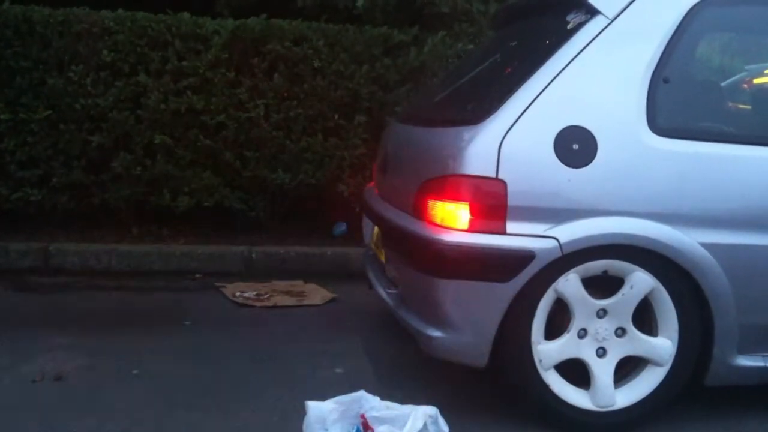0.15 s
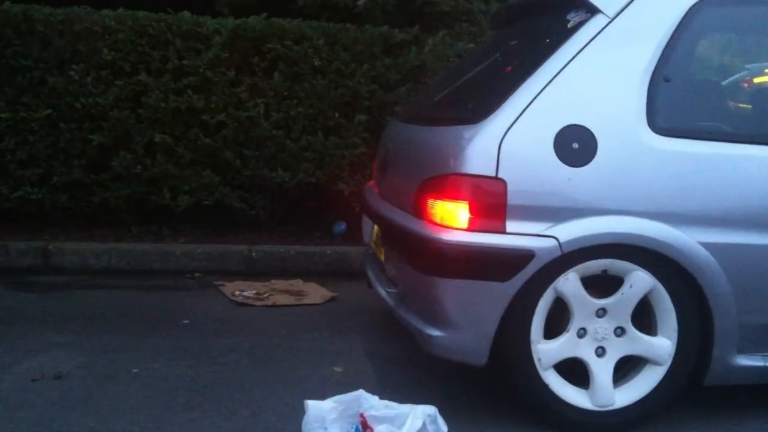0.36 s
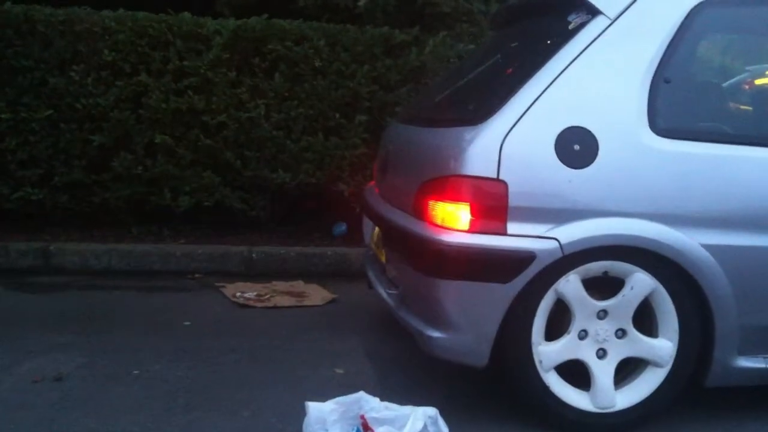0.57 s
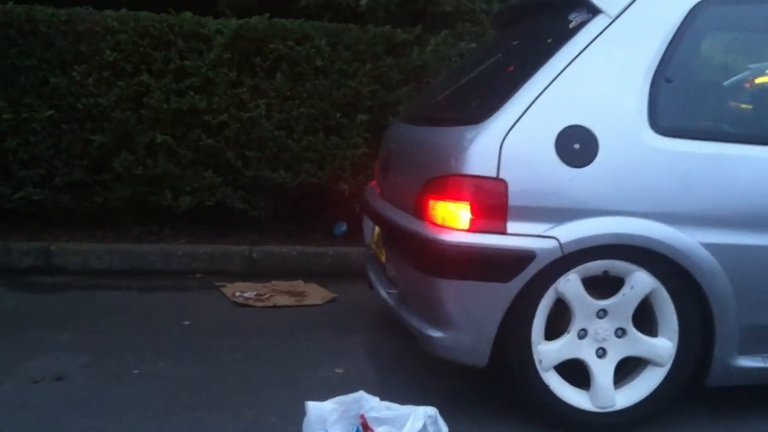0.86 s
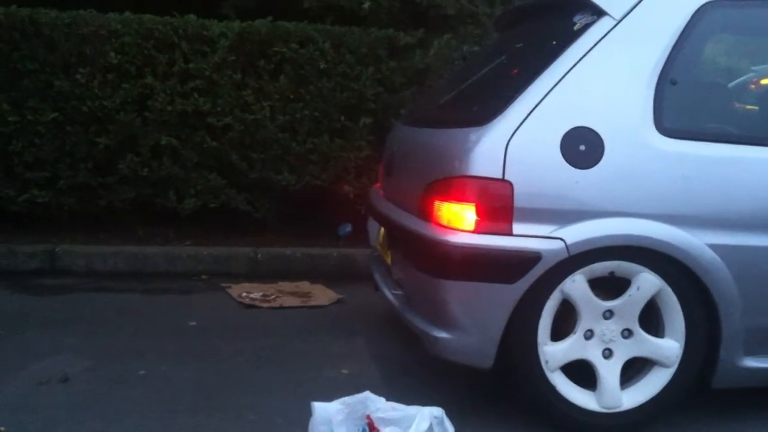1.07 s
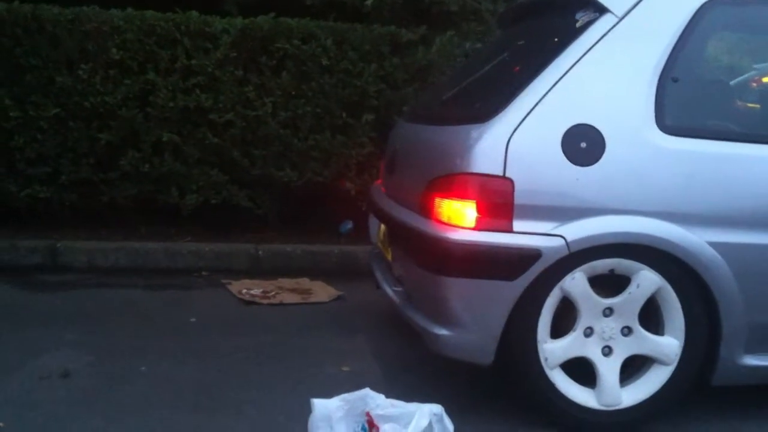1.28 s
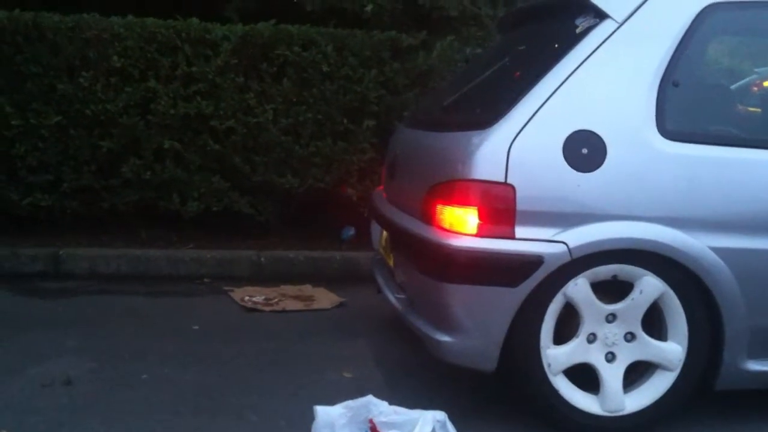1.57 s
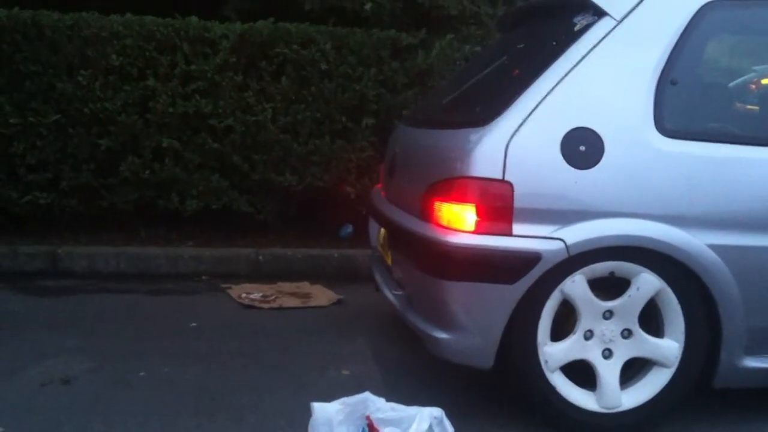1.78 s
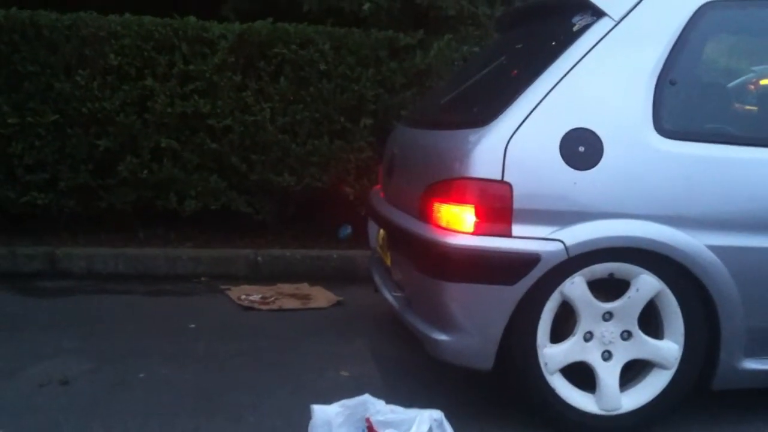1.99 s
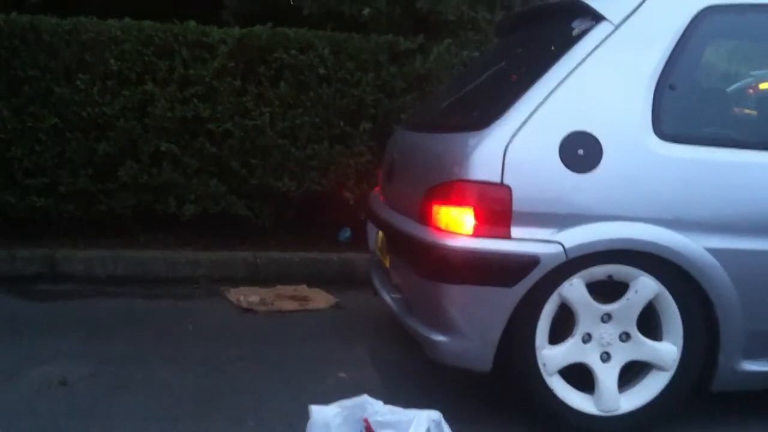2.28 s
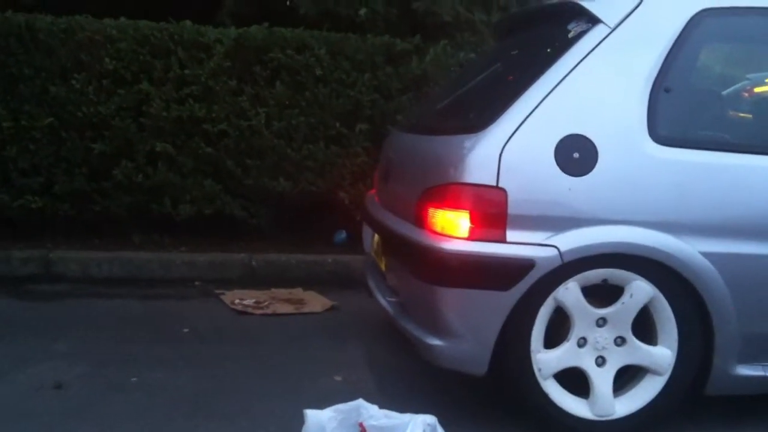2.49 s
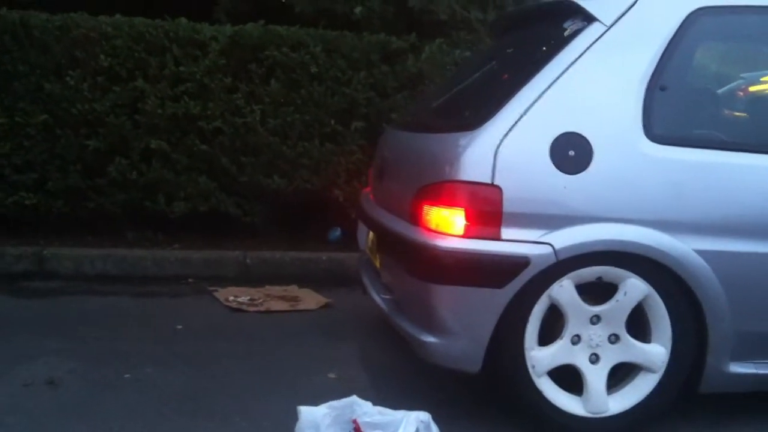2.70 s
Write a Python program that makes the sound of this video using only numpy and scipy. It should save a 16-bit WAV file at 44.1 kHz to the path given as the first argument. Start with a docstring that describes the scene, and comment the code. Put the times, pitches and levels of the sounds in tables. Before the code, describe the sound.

Loud backfire bang from a small car, followed by two quick revs and exhaust pops.

```python
"""A street between houses, the microphone a few metres beside the tailpipe of a small hatchback.
The four-cylinder engine's revs fall; unburnt fuel explodes in the exhaust and the house fronts
slap the bang back. Two throttle blips boom and rasp in the pipe, each sinking into a drone, and
sharp pops follow. Behind it all the engine bay rushes and whines."""
import sys
import numpy as np
from scipy import signal
from scipy.fft import rfft, irfft
from scipy.io import wavfile
from scipy.ndimage import map_coordinates

SR = 44100
rng = np.random.default_rng(int(sys.argv[2]) if len(sys.argv) > 2 else 0)


def dump_mix(stems):
    """Bounce the given channels to the path in sys.argv[1] as a 16-bit WAV at rate SR."""
    frames = np.atleast_2d(stems).T  # one column per channel
    limited = np.clip(frames, -1, 1)  # hard clip at full scale
    pcm = np.round(limited * 32767).astype(np.int16)
    wavfile.write(sys.argv[1], SR, pcm)


N = 125685
T = np.arange(N) / SR


def undb(db):
    return 10 ** (np.asarray(db) / 20)


def unit(x):
    """Scale to rms 1."""
    return x / np.sqrt(np.mean(x ** 2))


def curve(rows, column=1):
    """One column of a table joined by straight lines in time."""
    rows = np.array(rows)
    return np.interp(T, rows[:, 0], rows[:, column])


def colour(x, points):
    """Filter by a spectrum of (Hz, dB) points, falling away below the first."""
    hz, db = np.array(points).T
    f = np.maximum(np.arange(N + 1) * SR / (2 * N), 1)
    gain = undb(np.interp(np.log(f), np.log(hz), db)) * np.minimum(f / hz[0], 1) ** 2
    return irfft(rfft(x, 2 * N) * gain)[:N]


def noise(points):
    """Coloured noise of rms 1."""
    return unit(colour(rng.standard_normal(N), points))


def resonate(x, hz, width):
    """One resonance, gain 1 at its centre."""
    return signal.lfilter(*signal.iirpeak(hz, hz / width, fs=SR), x)


def walk(rate):
    """Smooth random drift, `rate` steps a second, with a spread near 1."""
    return map_coordinates(rng.standard_normal(4096), [T * rate], order=2, mode="wrap")


def burst(start, decay, attack=.0006):
    """A quick rise and an exponential fall; times in seconds."""
    age = np.maximum(T - start, 0)
    return np.minimum(age / attack, 1) * np.exp(-age / decay)


# Clatter and belt hiss from the far end of the car (frequency [Hz], level [dB])
CLATTER_SPECTRUM = [(100, 6.5), (250, 6), (340, -6), (450, -0.5), (700, 1.5), (1050, 2), (1400, -2),
                    (1700, 2.5), (2150, 1.5), (2500, -12), (4000, -76)]
BELT_SPECTRUM = [(1500, -16), (2600, 1.5), (3400, 5.5), (5000, 1), (11000, -7.5), (16000, -10.5)]
# Slow sway of both (time [s], level [dB])
BAY_SWAY = [(0, 1), (.6, -0.5), (1.9, 3), (2.5, 3), (2.7, -4)]

def engine_bay(firing_hz, turns):
    """Clatter and belt hiss grow with the revs and pulse faintly with each firing."""
    octaves = np.log2(firing_hz / 100)
    flicker = (1 + .022 * np.cos(2 * np.pi * turns)) * undb(.9 * walk(70))
    clatter = undb(-33.5 + 8 * octaves) * noise(CLATTER_SPECTRUM)
    belt = undb(-40 + 10.5 * octaves) * noise(BELT_SPECTRUM)
    return (clatter + belt) * flicker * undb(curve(BAY_SWAY))


# Moments when the whine comes forward (time [s], half length [s], level [dB])
WHINE_SWELLS = [(0.154, 0.11, -36), (1.012, 0.02, -48), (1.791, 0.05, -33.5), (2.263, 0.015, -30),
                (2.394, 0.0096, -31), (2.433, 0.02, -30.5)]

def whine(hz=2024, width_hz=82, rest_db=-48.5):
    """A thin, wavering whine in the engine bay swells now and then."""
    swells = sum(undb(db) * np.exp(-((T - at) / half) ** 2) for at, half, db in WHINE_SWELLS)
    ring = resonate(resonate(rng.standard_normal(N), hz, width_hz), hz, width_hz)
    wavering = map_coordinates(ring, [(T + .001 * walk(12)) * SR], order=1, mode="mirror")
    return (undb(rest_db) + swells) * unit(wavering)


# The four cylinders in firing order (level [dB])
CYLINDER_DB = [1.4, -.8, .4, -1.7]

def firings(turns, scatter_db, jitter_s):
    """One pulse per firing; the cylinders differ and every firing varies."""
    count = np.arange(1, int(turns[-1]))
    timing, strength = rng.standard_normal((512, 2))[:len(count)].T
    at = np.interp(count, turns, T) + jitter_s * timing
    level_db = np.array(CYLINDER_DB)[count % len(CYLINDER_DB)] + scatter_db * strength
    pulses = np.zeros(N)
    pulses[np.clip((at * SR).astype(int), 0, N - 1)] = undb(level_db)
    return pulses


def exhaust_tone(turns, orders, rough, flutter_rate):
    """Multiples of the firing rate, each wavering in level and phase; rms 1."""
    out = 0
    for order, db in orders:
        flutter = 1 + rough * (walk(flutter_rate) + 1j * walk(flutter_rate))
        out += undb(db) * (flutter * np.exp(2j * np.pi * order * turns)).imag
    return unit(out)


# The burble between blips (time [s], level [dB])
IDLE_LEVEL = [(.3, -39.5), (.55, -42), (.71, -47), (.78, -39), (.93, -43.5), (1.02, -45), (1.7, -34),
              (1.95, -34), (2.65, -46), (2.85, -38)]
# Its partials (multiple of the firing rate, level [dB])
IDLE_ORDERS = [(1, 6), (2, -1.5), (3, 7.5), (4, 0.5), (5, -20)]
# What the silencer lets into the street (frequency [Hz], gain [dB])
SILENCER_RESPONSE = [(60, 6), (95, 0), (125, 4), (165, -1.5), (215, -5.5), (350, -8), (600, 2)]

def idle(turns):
    """At low revs the exhaust burbles unevenly through the silencer."""
    burble = exhaust_tone(turns, IDLE_ORDERS, rough=.3, flutter_rate=18)
    return undb(curve(IDLE_LEVEL)) * unit(colour(burble, SILENCER_RESPONSE))


# Stretches with the throttle shut (start [s], end [s], level [dB])
OVERRUNS = [(-.05, 0.21, -28), (1.392, 1.68, -29.5), (2.321, 2.592, -26.5)]
# The drone's overtones and the gas hiss at the tailpipe (frequency [Hz], level [dB])
OVERRUN_SPECTRUM = [(110, -22), (185, 2), (230, 2), (280, 3.5), (335, -26), (410, -1.5), (520, -14),
                    (1300, -41)]
HISS_SPECTRUM = [(1000, -4), (2500, -1.5), (4000, 5), (5500, 1), (8300, 3), (11000, -3.5), (16000, -1)]

def overrun(turns, fade_s=.014):
    """With the throttle shut the pipe drones and hisses over weak, ragged firings."""
    level = sum(undb(db) * np.clip(np.minimum(T - start, end - T) / fade_s + .5, 0, 1)
                for start, end, db in OVERRUNS)
    drone = np.sqrt(2) * np.sin(2 * np.pi * turns)
    pulses = firings(turns, scatter_db=2.8, jitter_s=.00018)
    overtones = undb(-8) * unit(colour(pulses, OVERRUN_SPECTRUM))
    return level * (drone + overtones + undb(-22.5) * noise(HISS_SPECTRUM))


# Resonances of the tailpipe (frequency [Hz], width [Hz], gain [dB])
PIPE_MODES = [(425.4, 25.7, 6.5), (481.7, 47, 5), (606.6, 47, 2), (739, 30, 1), (992, 105, 0.5),
              (1184, 18, 4.5), (1278, 13, -7), (1610, 32, -9)]

def tailpipe(x, wander_db=2.5, gust_rate=14):
    """The pipe rings; its resonances wax and wane in the gusts of hot gas."""
    return sum((-1) ** k * undb(db + wander_db * walk(gust_rate)) * resonate(x, hz, width)
               for k, (hz, width, db) in enumerate(PIPE_MODES))


# Two blips from beside the tailpipe, a list each (time [s], boom level [dB], rasp level [dB])
BLIPS = [
    [(1.06, -43, -54), (1.14, -27.5, -47), (1.22, -20, -37.5), (1.31, -15.5, -14.5), (1.335, -10.5, -15.5),
     (1.362, -9.5, -15)],
    [(1.99, -35, -37), (2.06, -18.5, -25), (2.13, -11, -12.5), (2.2, -11.5, -16), (2.27, -14.5, -17)],
]
# The boom under load (multiple of the firing rate, level [dB])
LOAD_ORDERS = [(1, -1.5), (1.5, -17), (2, 2), (2.5, -13), (3, -16.5), (4, -8), (5, -25), (6, -30)]
# Growl in the silencer and gas puffing from the pipe (frequency [Hz], level [dB])
GROWL_SPECTRUM = [(90, -11), (150, 13), (200, 2.5), (300, 1), (380, -5.5), (520, -40), (1500, -52)]
GAS_SPECTRUM = [(150, -5), (300, -9.5), (600, -7), (1150, -13), (1500, -12), (2500, -21.5), (5000, -35)]

def throttle_blips(turns, shut_db_per_s=704, growl_limit_db=-23.5):
    """Under load the firings boom, growl in the silencer, ring the pipe and blow out puffs of gas."""
    boom_db = rasp_db = -np.inf
    for blip in BLIPS:
        outside_s = np.maximum(np.maximum(blip[0][0] - T, T - blip[-1][0]), 0)
        boom_db = np.maximum(boom_db, curve(blip, column=1) - shut_db_per_s * outside_s)
        rasp_db = np.maximum(rasp_db, curve(blip, column=2) - shut_db_per_s * outside_s)
    pulses = firings(turns, scatter_db=2, jitter_s=.00007)
    puffs = unit(1 + .095 * np.cos(2 * np.pi * turns))
    boom = undb(boom_db + .5) * exhaust_tone(turns, LOAD_ORDERS, rough=.11, flutter_rate=40)
    lumpy = firings(turns, scatter_db=3, jitter_s=.0003)
    growl = undb(np.minimum(boom_db + .5, growl_limit_db)) * unit(colour(lumpy, GROWL_SPECTRUM))
    ring = undb(-1.5) * unit(tailpipe(pulses))
    gas = undb(-9) * puffs * noise(GAS_SPECTRUM)
    hiss = undb(-20.5 + .84 * boom_db) * puffs * noise(HISS_SPECTRUM)
    return boom + growl + undb(rasp_db) * (ring + gas) + hiss


# Pops in the exhaust (time [s], thump [dB], ring [dB], crack [dB], crack decay [s], sizzle [dB])
POPS = [(0.2117, -4.5, -18, -16.5, 0.0074, -29), (0.2344, -26, -17, -10.5, 0.004, -30),
        (0.247, -38, -19, -7, 0.0063, -35), (1.635, -35, -28.5, -33, 0.035, -44),
        (2.2835, -10, -13.5, -19.5, 0.0082, -48), (2.2895, -15, -15, -28, 0.00093, -14.5),
        (2.294, -27, -21, -43, 0.0063, -25), (2.547, -4, -10, -16.5, 0.014, -32.5),
        (2.602, -11.5, -14.5, -10.5, 0.012, -26.5)]
# Crack and sizzle at the pipe's mouth (frequency [Hz], level [dB])
CRACK_SPECTRUM = [(150, 16), (400, 10.5), (1000, 15.5), (1800, 12), (2800, 3), (4200, 3), (12000, -21)]
SIZZLE_SPECTRUM = [(2500, -10), (5000, -1), (9000, 1), (16000, -2)]

def pops(thump_hz=183):
    """Small explosions thump the silencer, ring the pipe and crack and sizzle at its mouth."""
    crack, sizzle, out = noise(CRACK_SPECTRUM), noise(SIZZLE_SPECTRUM), 0
    for at, thump_db, ring_db, crack_db, decay, sizzle_db in POPS:
        ring = tailpipe(signal.unit_impulse(N, int(at * SR)) + 1e-18)
        out += undb(thump_db) * burst(at, decay=.006) * np.sin(2 * np.pi * thump_hz * (T - at))
        out += undb(ring_db) * ring / np.abs(ring).max()
        out += undb(crack_db) * crack * burst(at, decay)
        out += undb(sizzle_db) * sizzle * burst(at, 1.73 * decay)
    return out


# Slaps off house fronts some twenty metres away (delay [s], level [dB])
SLAPS = [(0.117, -13), (.132, -2)]
# Scatter along the street (delay [s], level [dB], decay [s])
TAILS = [(.02, -18, 0.5), (0.164, -10, 0.063)]
# Colour of both back at the microphone (frequency [Hz], gain [dB])
ECHO_COLOUR = [(80, -24), (250, -12), (650, -5), (900, 2), (1180, 5.5), (1800, -2), (2500, -9), (8000, -19),
               (16000, -33)]

def street_echo(x):
    """House fronts slap the bang back, duller; a scattered tail follows."""
    response = sum(undb(db) * signal.unit_impulse(N, int(delay * SR)) for delay, db in SLAPS)
    for delay, db, decay in TAILS:
        scatter = rng.standard_normal(N) * burst(delay, decay)
        response += undb(db) * scatter / np.linalg.norm(scatter)
    return colour(signal.fftconvolve(x, response)[:N], ECHO_COLOUR)


# The bang from a few metres, by octave (centre [Hz], level [dB], limiter hold [s], fall [dB/s])
ROAR_BANDS = [(353, -18.5, 0.034, 370), (726, -18, 0.036, 350), (1820, -18, 0.038, 430),
              (3400, -12, 0.031, 395), (7230, -11.5, 0.02, 337), (14300, -13, 0.028, 420)]

def backfire(start, attack_s=.004):
    """The backfire roars, held flat briefly by the recorder's limiter, then dies away."""
    age, out = T - start, 0
    for hz, db, hold, fall in ROAR_BANDS:
        octave = signal.butter(2, [hz / np.sqrt(2), hz * np.sqrt(2)], "band", fs=SR, output="sos")
        band = unit(signal.sosfilt(octave, rng.standard_normal(N)))
        out += band * undb(db - fall * np.maximum(age - hold, 0))
    return out * np.clip(age / attack_s, 0, 1)


# Revs of the standing car (time [s], firing rate [Hz])
FIRING_RATE = [(0, 104), (.2, 93.5), (.45, 72), (.72, 56.5), (1.06, 48.5), (1.12, 57), (1.23, 79.5),
               (1.31, 95.5), (1.385, 104), (1.6, 86.5), (1.99, 65), (2.06, 82.5), (2.13, 96.6),
               (2.285, 107.6), (2.42, 100.8), (2.54, 93.4), (2.85, 73)]

def scene(bang_s=.2165):
    """Engine, backfire and street as they meet at one microphone."""
    firing_hz = curve(FIRING_RATE)
    turns = np.cumsum(firing_hz) / SR  # one turn per firing
    bang = backfire(bang_s)
    blast = bang * burst(bang_s, decay=.05, attack=.012)  # the bang's front carries to the houses
    exhaust = throttle_blips(turns) + overrun(turns) + idle(turns)
    bay = engine_bay(firing_hz, turns) + whine()
    return (bay + exhaust + street_echo(blast) + pops() + bang)[None]


def record(dry, low_cut_hz=95.8, ceiling=.59, top_hz=15800):
    """The microphone thins the bass, notches the treble, flattens the loudest peaks and cuts the top."""
    notched = dry - resonate(dry, hz=7190, width=270)
    thin = signal.sosfilt(signal.butter(4, low_cut_hz, "high", fs=SR, output="sos"), notched)
    flat = thin / (1 + (thin / ceiling) ** 4) ** (1 / 4)
    return signal.sosfiltfilt(signal.ellip(8, .1, 45, top_hz, fs=SR, output="sos"), flat)


dry = scene()
out = record(dry)
dump_mix(out)
```